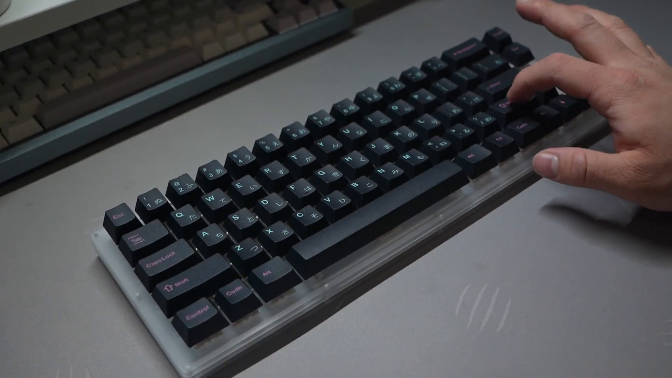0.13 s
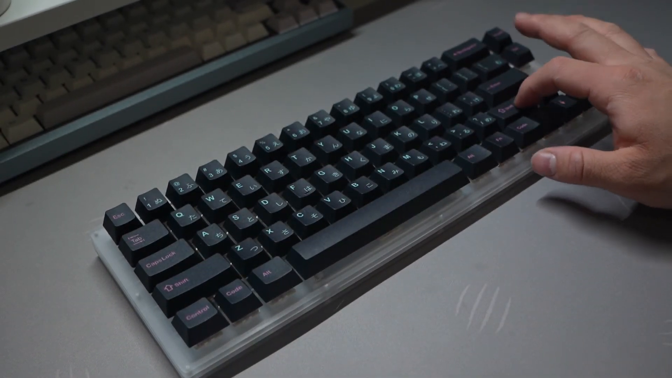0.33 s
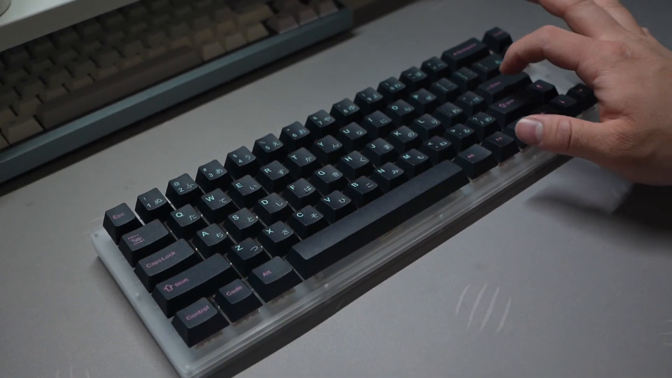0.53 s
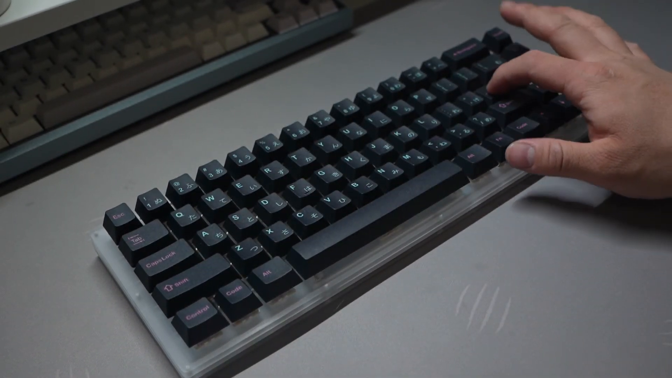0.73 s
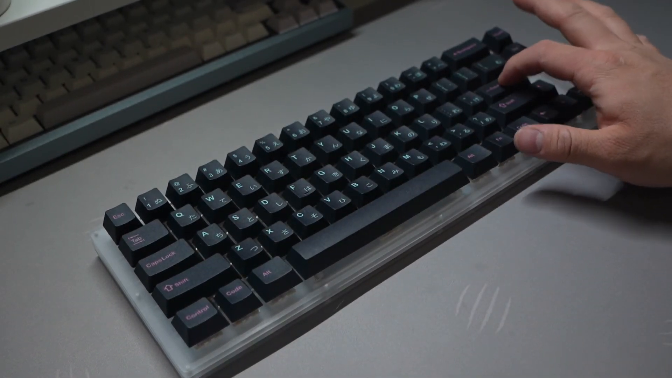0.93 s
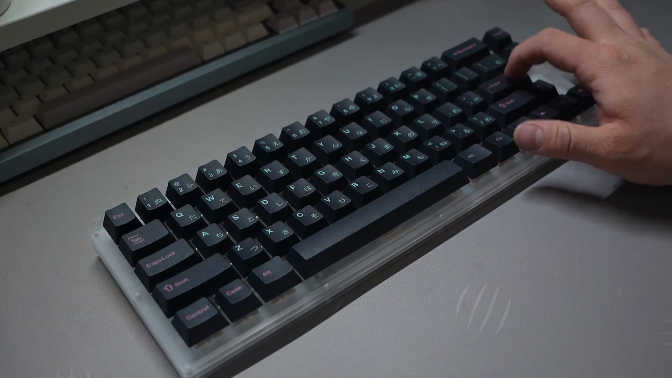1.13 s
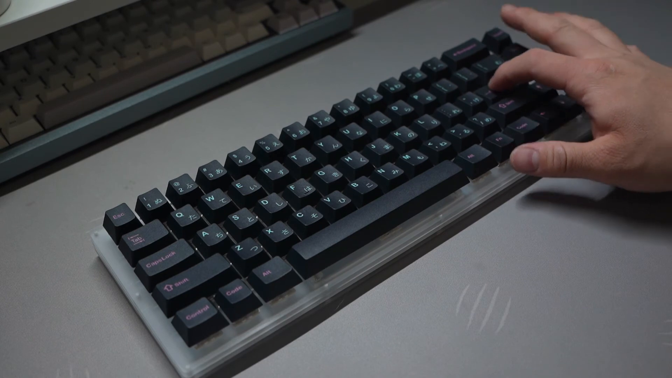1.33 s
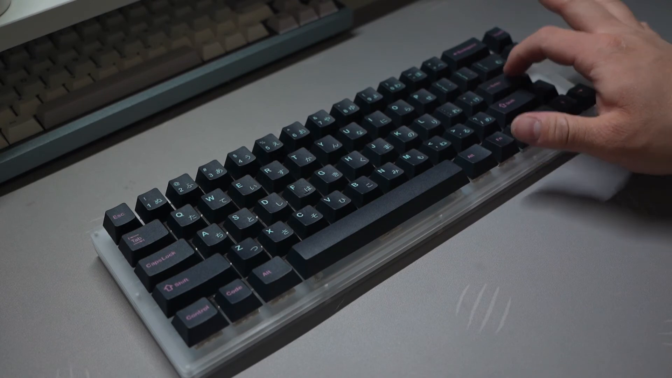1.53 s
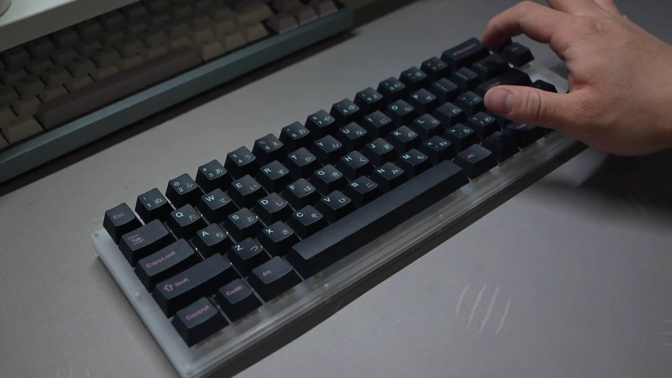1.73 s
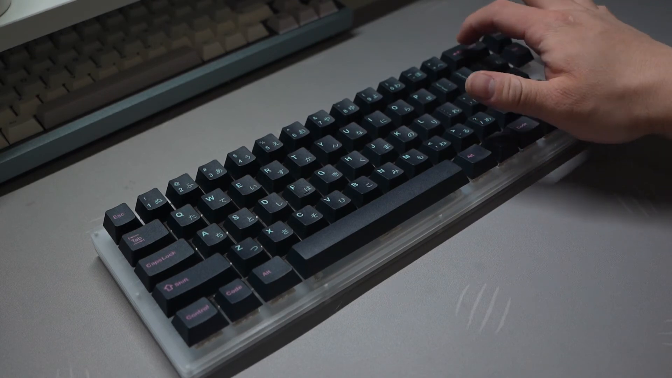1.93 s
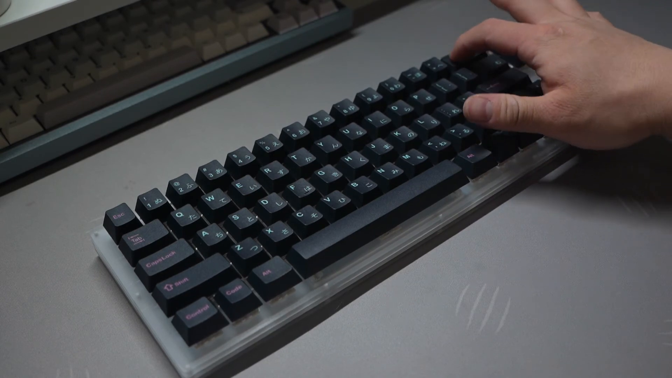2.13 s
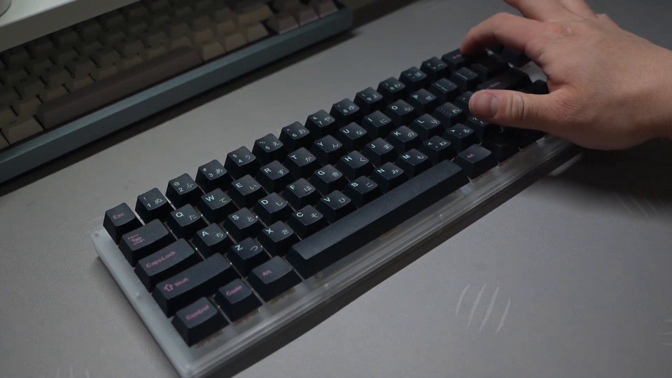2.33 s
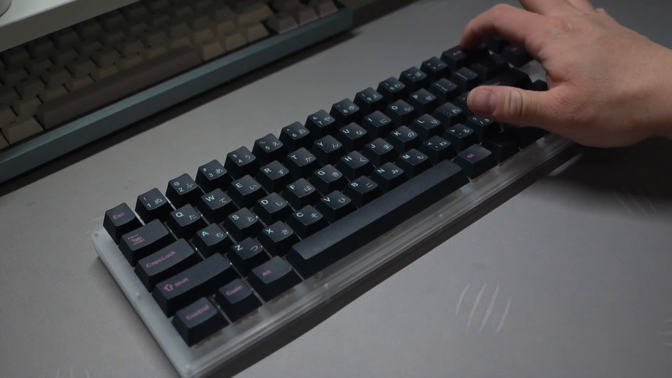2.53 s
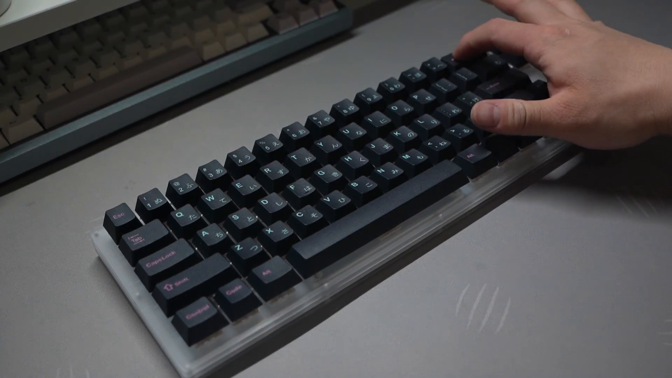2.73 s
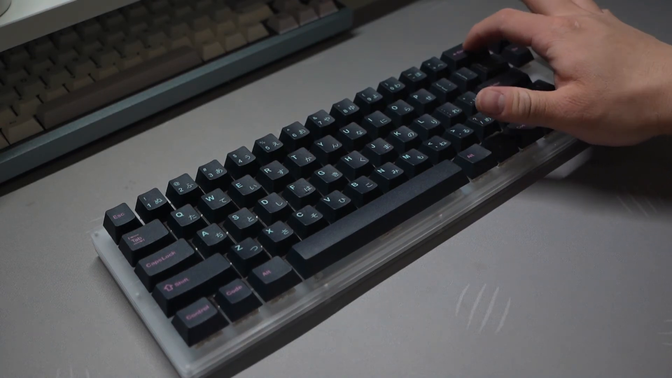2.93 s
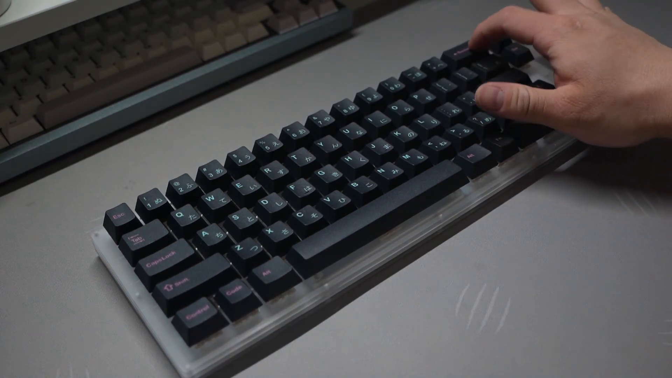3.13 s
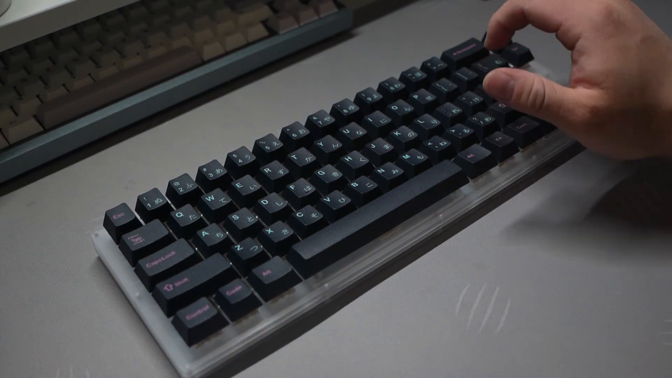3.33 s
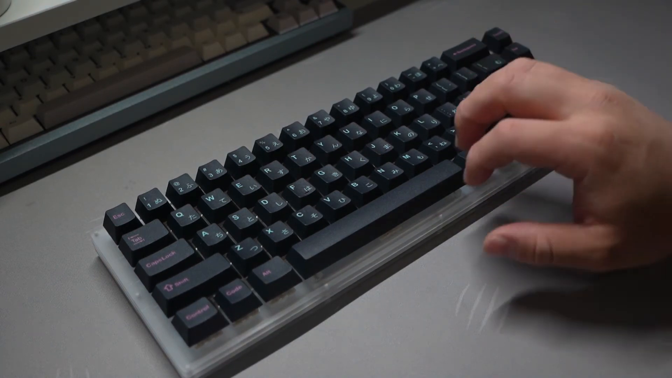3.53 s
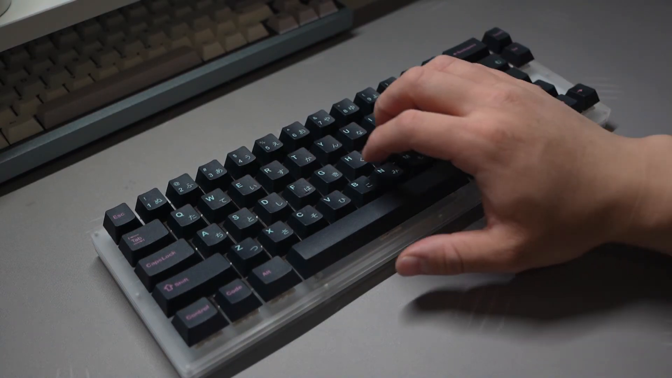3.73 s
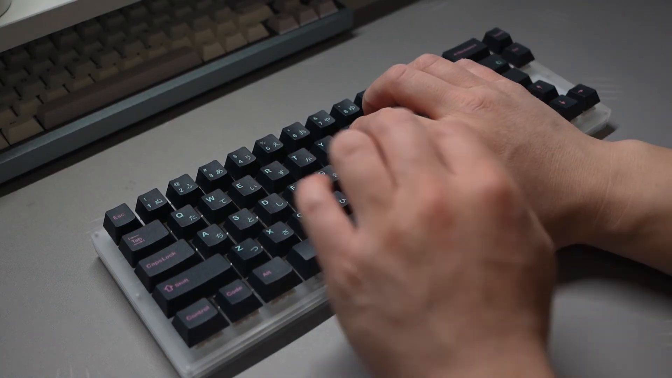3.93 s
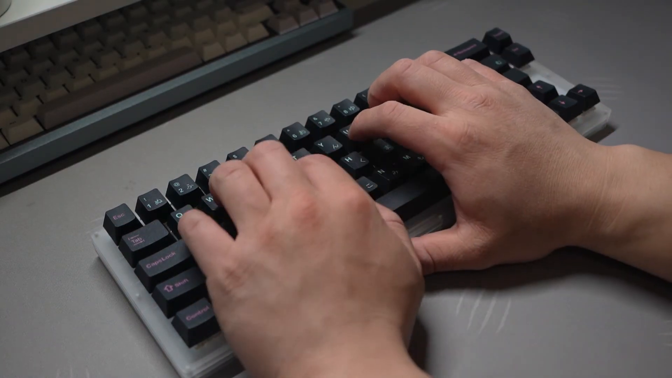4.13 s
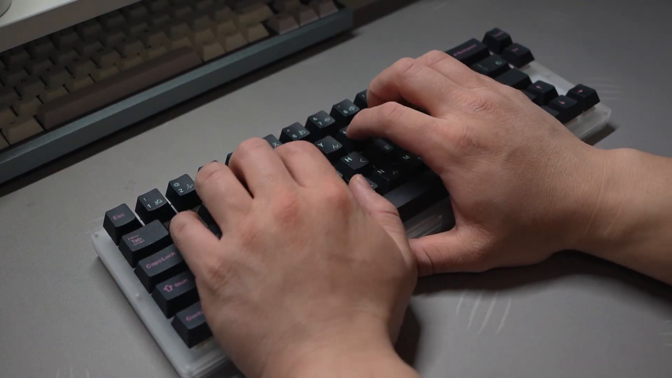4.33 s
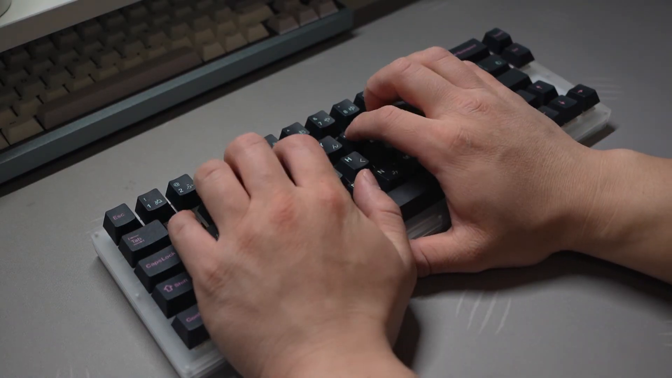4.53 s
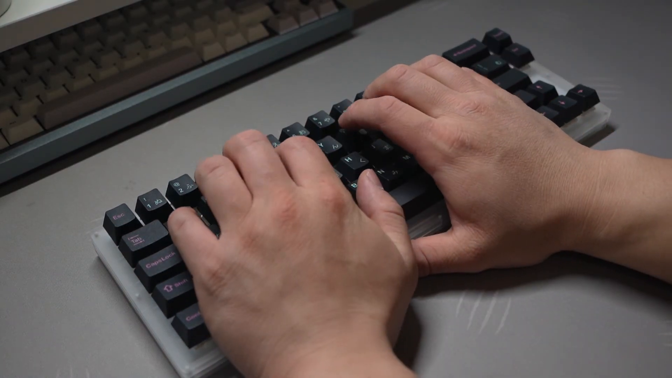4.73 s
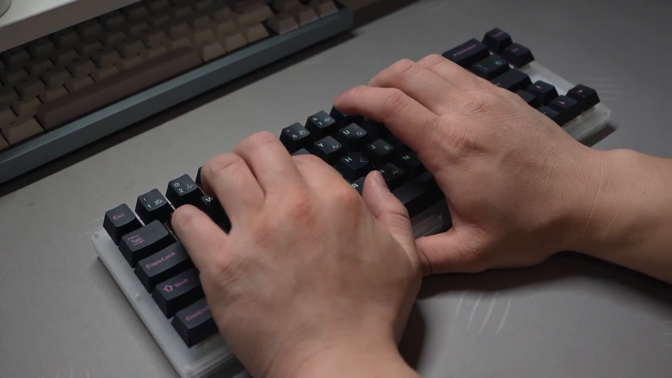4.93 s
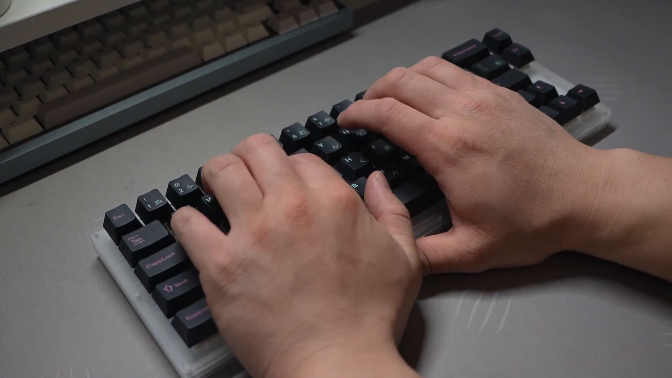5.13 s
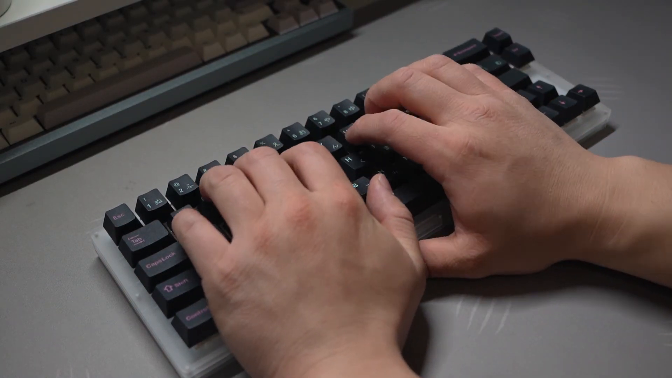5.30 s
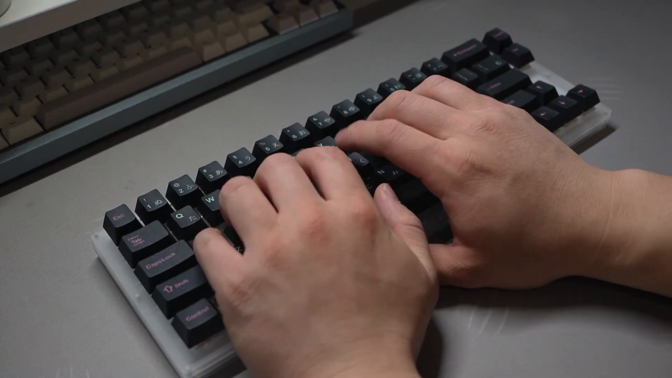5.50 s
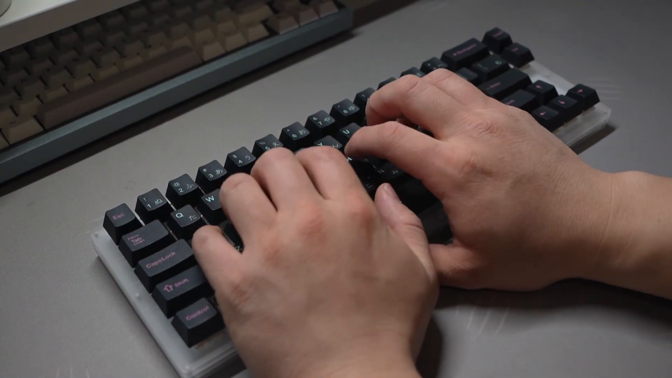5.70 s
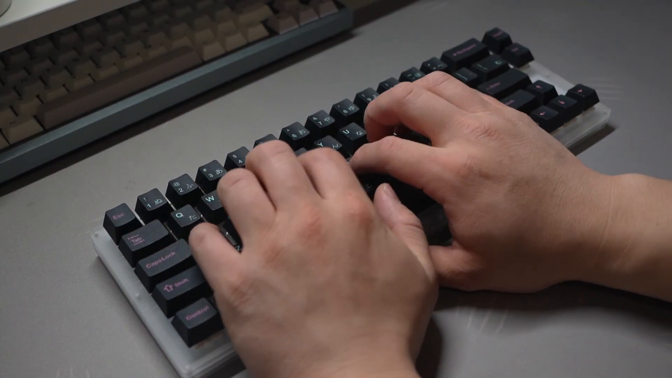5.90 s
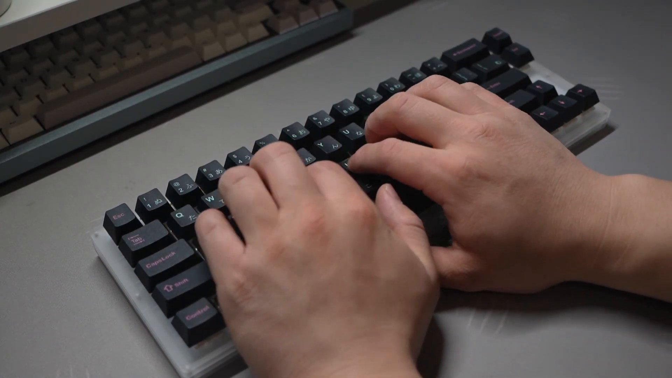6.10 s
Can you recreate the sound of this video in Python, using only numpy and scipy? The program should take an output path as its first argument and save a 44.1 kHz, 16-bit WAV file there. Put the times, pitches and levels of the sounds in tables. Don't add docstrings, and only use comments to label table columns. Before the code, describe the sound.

Close-up mechanical keyboard in a small quiet room. A finger taps one wide key four times, a second seven times growing harder, a third ten times with a lower, hollower tone, each press followed by a lighter upstroke click. A sleeve brushes faintly in the pause, then both hands type rapidly in dense uneven bursts to the end.

```python
import sys
import numpy as np
from scipy import signal
from scipy.fft import rfft, irfft
from scipy.io import wavfile
from scipy.ndimage import uniform_filter1d

SR = 44100
rng = np.random.default_rng(int(sys.argv[2]) if len(sys.argv) > 2 else 0)


def convert_level_to_amplitude(level_db):
    exponent = np.asarray(level_db, float) / 20
    return 10 ** exponent


def unload_audio(sound):
    columns = np.transpose(np.atleast_2d(sound))
    steps = np.round(np.clip(columns, -1, 1) * 32767)
    wavfile.write(sys.argv[1], SR, steps.astype(np.int16))


N = 271656
LEAD = 4410


def evened(x):
    return x / np.sqrt(np.mean(x ** 2) + 1e-20)


def read(points, hz):
    f, value = np.transpose(points)
    return np.interp(np.log(hz + 1), np.log(f + 1), value)


def coloured(x, points):
    gain = convert_level_to_amplitude(read(points, np.fft.rfftfreq(len(x), 1 / SR)))
    return irfft(rfft(x) * gain, len(x))


def add(mix, s, sound):
    part = mix[round(s * SR):][:len(sound)]
    part += sound[:len(part)]


def ring(hz, width, t):
    return np.exp(-np.pi * width * t) * np.sin(2 * np.pi * hz * t)


# freq_hz, width_hz, level_db
KEY_A_MODES = [(645, 220, -19.5), (1340, 580, -10), (1940, 460, -4.5), (2540, 340, -2.5), (2865, 280, 2.5),
               (3340, 410, -2.5), (4030, 1000, -7), (5070, 700, -12.5), (6230, 800, -7.5),
               (8260, 2100, -13), (10600, 1600, -16), (13700, 2400, -22.5)]
# freq_hz, width_hz, level_db
KEY_A_WIRES = [(6500, 130, -18), (2950, 550, -23)]
# start_s, clack_db, touch_db, extra_plate_db, extra_stem_db
KEY_A_STROKES = [
    (-0.065, -12, -60, -4.5, -3.5),
    (0.0781, -12, -37.5, 2.5, -0.5),
    (0.223, -14.5, -73.5, -4, -1.5),
    (0.3638, -12, -25, 0, -1),
]
# case_db, plate_db, stem_db
KEY_A_VOICE = [
    (-13.5, -4, 11),
    (-17.5, -16.5, -1),
    (-29.5, 5, -4.5),
]
KEY_A_LAG = (0.72, 1, 0.082)
# start_s, clack_db, plate_db, stem_db, cap_hz
KEY_A_LOOSE = [
    (0.1, -29, -12.5, -39.5, 3300),
    (0.285, -35, -31, -5, 4000),
]
# start_s, clack_db, plate_db, stem_db, cap_hz
KEY_A_RELEASES = [
    (0.0086, -35, -1, 7.5, 2640),
    (0.1612, -33, -2.5, 9, 2090),
    (0.3055, -31.5, -8, -2, 1660),
    (0.4464, -27.5, -8.5, 7, 3630),
]
CAP_RINGS = [
    [2800, 2450, 3300, 2780],
    [3480, 2950, 3010, 3060, 3420, 3660, 4600],
    [2300, 3420, 3420, 3250, 2500, 2200, 3420, 3250, 4200, 2300],
]
# level_db at a silent cap, db_per_db
THUD_OF_LOOSE = (-51.5, 1)
# level_db at a silent cap, db_per_db
THUD_OF_RELEASE = [
    (-40, 1),
    (-52, 0.82),
    (-34.5, 0.58),
]


def key_a():
    downs = strokes(KEY_A_STROKES, KEY_A_VOICE, KEY_A_LAG, lead_s=0.0106, echo_db=-26, cap_hz=CAP_RINGS[0])
    loose = contacts(KEY_A_LOOSE, THUD_OF_LOOSE)
    ups = contacts(KEY_A_RELEASES, THUD_OF_RELEASE[0])
    return key(np.vstack([downs, loose, ups]), KEY_A_MODES, -42.5, KEY_A_WIRES, alike=0.6,
               plate_far_db=1.5, cap_db=1.5, settle=0.15, cap_far_db=-3)


# freq_hz, width_hz, level_db
KEY_B_MODES = [(400, 430, -11.5), (657, 240, -9), (1270, 390, -2), (1930, 290, -3.5), (2350, 580, -8),
               (2900, 570, 1), (3580, 570, 2.5), (4710, 1000, 2.5), (5700, 730, 0.5), (6880, 1300, -2.5),
               (8500, 1500, -1.5), (10100, 4500, -8.5), (13000, 4200, -25)]
# freq_hz, width_hz, level_db
KEY_B_WIRES = [(5950, 330, -10.5), (10100, 710, -13)]
# start_s, clack_db, touch_db, extra_plate_db, extra_stem_db
KEY_B_STROKES = [
    (0.641, -19, -54.5, 0.39, 0.18),
    (0.7894, -19.5, -70.5, .3, .3),
    (0.929, -16, -51.5, 0.27, 0.36),
    (1.069, -14, -43, .3, .3),
    (1.2127, -10, -37.5, .3, .3),
    (1.3572, -9.5, -45, 0.32, 0.28),
    (1.5017, -11, -40.5, .3, 0.318),
]
# case_db, plate_db, stem_db
KEY_B_VOICE = [
    (-11.5, -11.5, -9),
    (-25.5, -16, -0.5),
    (-18, 2.5, 8),
]
KEY_B_LAG = (0.27, 0.25, -0.13)
# start_s, clack_db, plate_db, stem_db, cap_hz
KEY_B_STRAYS = [
    (0.6283, -59.5, 12, 7, 3000),
    (0.726, -31.5, -9, -7, 4500),
    (0.858, -35, -13, -2.5, 2200),
    (1.441, -30.5, -7.5, -3.5, 3800),
]
# freq_hz, level_db
KEY_B_AROUND = [(1500, -0.5), (2250, -2), (2950, 2.5), (3800, 1), (5200, -5.5), (5950, -0.5), (7200, -0.5)]


def key_b():
    downs = strokes(KEY_B_STROKES, KEY_B_VOICE, KEY_B_LAG, lead_s=0.0087, echo_db=-29.5, cap_hz=CAP_RINGS[1])
    blows = np.vstack([downs, contacts(KEY_B_STRAYS, THUD_OF_LOOSE)])
    clacks, spread, pushes, shakes = key(blows, KEY_B_MODES, -41.5, KEY_B_WIRES, alike=0.55,
                                         plate_far_db=-1.5, cap_db=1.5, settle=0.1, cap_far_db=-9)
    return clacks, coloured(spread, KEY_B_AROUND), pushes, shakes


# freq_hz, width_hz, level_db
KEY_C_MODES = [(606, 100, -13), (860, 290, -1), (1080, 63, 2), (1248, 430, 3), (1850, 110, -2.5),
               (2300, 180, -3.5), (3300, 1160, -2.5), (4400, 720, -11.5), (5250, 460, -7), (7140, 2200, -7),
               (8750, 2000, -16), (11300, 1400, -13.5), (14560, 1400, -23.5)]
# freq_hz, width_hz, level_db
KEY_C_WIRES = [(5760, 150, -11.5), (7560, 1000, -14)]
# start_s, clack_db, touch_db, extra_plate_db, extra_stem_db
KEY_C_STROKES = [
    (1.8875, -14, -40, 1, 0.28),
    (2.0374, -20, -48, 0.5, 0.63),
    (2.1904, -18.5, -49, -1.5, 0.58),
    (2.3317, -14.5, -39, -6, 0.37),
    (2.475, -18.5, -35, -3, 0.13),
    (2.6191, -16, -35.5, -3.5, .3),
    (2.7608, -21.5, -66.5, -1, 0.24),
    (2.9155, -16, -43.5, -4.5, 0.33),
    (3.0731, -21.5, -37, -2.5, 0.18),
    (3.208, -16, -30.5, -1.5, 0.29),
]
# case_db, plate_db, stem_db
KEY_C_VOICE = [
    (-11.5, -17.5, -0.5),
    (-18, -6.5, 1.2),
    (-62, -11, -11),
]
KEY_C_LAG = (0.49, 0.73, 0.51)
# start_s, clack_db, plate_db, stem_db, cap_hz
KEY_C_LOOSE = [
    (1.8774, -50.5, -16, 5, 3300),
]


def key_c():
    downs = strokes(KEY_C_STROKES, KEY_C_VOICE, KEY_C_LAG, lead_s=0.0096, echo_db=-31, cap_hz=CAP_RINGS[2])
    blows = np.vstack([downs, contacts(KEY_C_LOOSE, THUD_OF_LOOSE)])
    return key(blows, KEY_C_MODES, -37.5, KEY_C_WIRES, alike=0.45,
               plate_far_db=-3, cap_db=-1.5, settle=0.12, cap_far_db=-6)


# freq_hz, width_hz, level_db
EARLY_MODES = [(630, 81, -6), (1055, 103, 9), (1330, 280, 9), (1680, 210, 9.5), (2370, 1370, 1.5),
               (3420, 450, -0.5), (4070, 1070, -5.5), (5120, 990, -10), (6600, 1900, -10),
               (8500, 2000, -7.5), (10450, 860, -11), (12500, 2900, -19.5)]
# freq_hz, width_hz, level_db
EARLY_WIRES = [(10300, 890, -21)]
# start_s, clack_db, plate_db, stem_db
FINGERS_SETTLE = [
    (3.9025, -50, -17, -27),
    (4.0686, -51.5, -17, 0.5),
    (4.1855, -30, -14.5, -2.5),
    (4.2044, -40, -13, -2),
    (4.2671, -41.5, -5, -5),
    (4.6798, -43, -19, -3),
    (4.3024, -46.5, 3.5, -11),
    (4.3532, -47, -22, 5),
]
# start_s, clack_db, plate_db, stem_db
TYPING_1 = [(4.3832, -19, -15, -9.5), (4.3971, -34, 2, -14), (4.4021, -20.5, -12, -8),
            (4.409, -21, -14, -11), (4.4466, -31, -4.5, -2.5), (4.4895, -25.5, -10.5, -15),
            (4.4948, -31, -24, -12), (4.5004, -25.5, -11.5, -8), (4.5342, -17, -17, -8),
            (4.5532, -47, 6, -17), (4.5635, -34, 4, -3), (4.5672, -24.5, -17, -7), (4.581, -29, -8, -1),
            (4.5925, -28, -3, -10), (4.5985, -24, -10, -6), (4.6096, -16, -12.5, -4.5),
            (4.6217, -56, -14, 2), (4.6286, -42, 3, -25), (4.634, -28, -27, -14), (4.6457, -23, -8.5, -5.5),
            (4.6957, -20, -11, -9), (4.6984, -21.5, -10.5, -7), (4.7005, -34, -3, -3),
            (4.718, -26.5, -14, -8)]
TYPING_2 = [(4.7764, -21.5, -12, -19), (4.7826, -18, -14, -14), (4.7935, -34, 1, 3), (4.8237, -37, -7, -8),
            (4.8342, -18.5, -16.5, -4.5), (4.8467, -41, -11, -13), (4.8555, -16, -16.5, -12),
            (4.8775, -34, -7, -15), (4.8997, -11, -12, -7.5), (4.9317, -26.5, -13, -6),
            (4.9512, -11.5, -19, -18.5), (4.9626, -27, -16, -11), (4.982, -23, -12, -9)]
TYPING_3 = [(5.0459, -4, -25.5, -16.5), (5.057, -40, -19, -4), (5.066, -33, -1, -1),
            (5.0722, -31, -18, -23), (5.0908, -20, -9, -7.5), (5.1009, -21, -15, -12),
            (5.1537, -16, -16, -8.5), (5.156, -12.5, -11.5, -12.5), (5.1803, -9.5, -22.5, -14),
            (5.1996, -20.5, -37, -23), (5.2565, -15, -17, -15.5), (5.2659, -22, -12, -20),
            (5.297, -37, 1, -8), (5.3215, -36, -12, -5), (5.335, -32.5, -13, -8), (5.347, -38.5, -1, 1),
            (5.356, -30, -15, -6), (5.3713, -32, -4, 0), (5.3865, -32.5, -5, -3)]
EARLY_CAPS_1 = [1610, 3600, 4230, 2950, 1680, 4160, 1510, 3530, 2240, 2730, 2930, 2760, 2110, 2800, 2780,
                2800, 2650, 1550, 2650, 1500, 4500, 2970, 2820, 2900, 3080, 1497, 3160, 1750, 2910, 2070,
                2560, 3010]
EARLY_CAPS_2 = [3250, 2930, 3400, 2130, 2900, 2930, 3200, 1520, 1940, 2730, 3570, 2990, 1680, 2350, 3150,
                3210, 2520, 2900, 2970, 2410, 2450, 2970, 3530, 2790, 1620, 2650, 1810, 2800, 2520, 3010,
                1690, 1470]
# start_s, clack_db, plate_db, stem_db, cap_hz
EARLY_SECONDS = [
    (4.511, -51, -10, 0, 3020),
    (4.864, -30, -8, -11, 2970),
    (4.9036, -24, -16, -2, 2920),
    (4.972, -31, -17, -8, 3500),
    (4.546, -40, -5, 3, 3000),
    (5.038, -51, -15, 8, 3500),
    (5.175, -25, -15, -14, 2900),
    (5.238, -48, -13, 4, 3060),
]
# level_db at a silent cap, db_per_db
EARLY_THUD = (-45.5, 0.76)


def letters_early():
    typed = FINGERS_SETTLE + TYPING_1 + TYPING_2 + TYPING_3
    rows = np.column_stack([typed, np.append(EARLY_CAPS_1, EARLY_CAPS_2)])
    blows = contacts([*rows, *EARLY_SECONDS], EARLY_THUD)
    return key(blows, EARLY_MODES, -45, EARLY_WIRES, alike=0.3,
               plate_far_db=-1.5, cap_db=5.5, settle=0.08, cap_far_db=1.5)


# freq_hz, width_hz, level_db
LATE_MODES = [(630, 190, -3), (1104, 105, -3), (1420, 330, -1), (1796, 82, -1), (2520, 1200, 2),
              (3340, 800, 1.5), (4290, 760, -9), (5770, 1800, -29), (8000, 1600, -18.5), (9800, 1200, -29),
              (11430, 970, -23.5), (13950, 1800, -38)]
# freq_hz, width_hz, level_db
LATE_WIRES = [(11950, 900, -14)]
# start_s, clack_db, plate_db, stem_db
TYPING_4 = [(5.442, -14.5, -15, -10.5), (5.4621, -45, -23, 8), (5.5161, -16.5, -17, -12.5),
            (5.5264, -16.5, -25, -14), (5.5401, -14.5, -19, -19), (5.5485, -21, -21, -5.5),
            (5.6118, -16.5, -14.5, -5), (5.6213, -18.5, -15, -14), (5.6523, -34.5, -1, 10),
            (5.659, -31, -8, 6), (5.6769, -29.5, -14, -7)]
TYPING_5 = [(5.7275, -20.5, -13, -12), (5.738, -17, -19, -12), (5.766, -24, -14, -6),
            (5.789, -24.5, -28, 2.5), (5.8079, -15.5, -21, -17), (5.8257, -17, -35, -15),
            (5.837, -21, -12.5, -4), (5.8537, -27, -13, -2), (5.876, -34, -2, 4), (5.89, -17, -17, -4.5),
            (5.8996, -37, 1, 6), (5.9185, -30, -11, -20), (5.937, -30, -15, -16),
            (5.9522, -36.5, 3.5, 10.5), (5.9782, -16.5, -16.5, -7), (5.9819, -14, -15.5, -20),
            (5.9933, -24.5, -13, -5), (6.01, -29, -8, -4), (6.0442, -26.5, -41, 2),
            (6.074, -16.5, -15.5, -7.5), (6.0831, -16.5, -31, -15), (6.0998, -31, -12, -6),
            (6.124, -30, -9, 0), (6.1297, -23, -13, -4), (6.137, -32.5, -6, 7)]
LATE_CAPS = [3250, 3200, 2300, 2200, 2520, 2080, 2540, 3000, 1510, 3340, 2560, 3160, 2920, 2350, 4000, 2540,
             2540, 3230, 3060, 3010, 2980, 3270, 2540, 2910, 1850, 2950, 3040, 2500, 2300, 4270, 2640, 2520,
             3480, 3420, 2540, 3520]
# start_s, clack_db, plate_db, stem_db, cap_hz
LATE_SECONDS = [
    (5.473, -43, -15, 5, 3280),
    (5.73, -28.5, -1, 1, 3180),
    (6.064, -46, -21, 10, 3480),
]
# level_db at a silent cap, db_per_db
LATE_THUD = (-48, 0.94)


def letters_late():
    rows = np.column_stack([TYPING_4 + TYPING_5, np.ravel(LATE_CAPS)])
    blows = contacts([*rows, *LATE_SECONDS], LATE_THUD)
    return key(blows, LATE_MODES, -45, LATE_WIRES, alike=0.3,
               plate_far_db=-1.5, cap_db=6.0, settle=0.08, cap_far_db=1.5)


# freq_hz, width_hz, level_db
KEY_B_UP_MODES = [(600, 450, -22), (1230, 350, -2.5), (1870, 370, -7.5), (2520, 220, -8.5),
                  (3600, 300, -10), (4500, 800, -16.5), (5890, 600, -9.5), (8250, 1000, -16),
                  (9980, 1500, -19.5), (12850, 3000, -32.5)]
# start_s, clack_db, plate_db, stem_db, cap_hz
KEY_B_RELEASES = [
    (0.717, -31, -17, -8, 3000),
    (0.867, -34, -5, -6, 3100),
    (1.005, -24.5, -16, -15, 3030),
    (1.146, -24, -11, -7.5, 2870),
    (1.2925, -27.5, -8.5, -7.5, 2900),
    (1.433, -34, -6, 3, 2800),
    (1.586, -25, -13.5, -10, 2950),
]


def key_b_up():
    return key(contacts(KEY_B_RELEASES, THUD_OF_RELEASE[1]), KEY_B_UP_MODES, -41.5, KEY_B_WIRES[:1], alike=0.5,
               plate_far_db=-1.5, cap_db=-2.5, settle=0.1, cap_far_db=-1.5)


# freq_hz, width_hz, level_db
KEY_C_UP_MODES = [(610, 720, -13), (1105, 310, -3), (1820, 320, -5.5), (2300, 1100, 0.5), (3370, 780, 0),
                  (4500, 1300, -8), (5610, 940, -4.5), (7060, 750, -3), (8700, 1800, -18),
                  (11200, 1700, -20), (14400, 1600, -23)]
# start_s, clack_db, plate_db, stem_db, cap_hz
KEY_C_RELEASES = [
    (1.9688, -26.5, -15, -2, 3250),
    (2.115, -24.5, -17, -5, 3400),
    (2.265, -24.5, -22, -6, 2200),
    (2.412, -30, -14, 0.5, 2300),
    (2.562, -29.5, -12.5, -1, 3500),
    (2.6996, -26, -15, -2.5, 2300),
    (2.8411, -24, -12, -2, 2100),
    (2.996, -28.5, -12, 4, 3400),
    (3.143, -29.5, -10, 3.5, 1970),
    (3.294, -35.5, -6, 9.5, 1930),
]


def key_c_up():
    return key(contacts(KEY_C_RELEASES, THUD_OF_RELEASE[2]), KEY_C_UP_MODES, -37.5, KEY_C_WIRES[:1], alike=0.5,
               plate_far_db=-1.5, cap_db=1.5, settle=0.1, cap_far_db=-1.5)


def strokes(downs, voice, lag, lead_s, echo_db, cap_hz, echo_s=0.0099):
    s, db, touch_db, plate_db, stem_db = np.transpose(downs)
    extra_db = np.column_stack([0 * s, plate_db, stem_db])
    parts = [(s - lead_s, touch_db, 0), (s, db, extra_db), (s + echo_s, db + echo_db, extra_db)]
    rows = []
    for (at, level, extra), colour in zip(parts, np.array(voice)):
        lagging_db = np.outer(level - np.median(level), lag)
        rows.append(np.column_stack([at, level, extra + colour - lagging_db, cap_hz + 0 * s]))
    return np.vstack(rows)


def contacts(rows, thud):
    s, db, plate_db, stem_db, cap_hz = np.transpose(rows)
    return np.column_stack([s, db, thud[0] - thud[1] * db, plate_db, stem_db, cap_hz])


def key(blows, modes, shake_db, wires, alike, plate_far_db, cap_db, settle, cap_far_db):
    rise_s, rattle_s, cap_width_hz = 0.00016, 0.00056, 460
    clacks, spread, pushes = np.zeros((3, N + LEAD))
    s, db, case_db, plate_db, stem_db, cap_hz = np.transpose(blows)
    near, far = [[*modes, (cap_hz[:, None], cap_width_hz, cap_db + extra_db)] for extra_db in (0, cap_far_db)]
    levels_db = db[:, None] + np.transpose([case_db, plate_db, 0 * db, stem_db])
    t = np.arange(256) / SR
    habit = rng.standard_normal(256)
    chance = np.clip(rng.standard_normal((len(s), 300)), -1.7, 1.7)
    envelope = (1 - np.exp(-t / rise_s)) * (np.exp(-t / rattle_s) + settle * np.exp(-t / 0.004))
    rattle = rfft(envelope * (alike * habit + (1 - alike) * chance[:, :256]), 1024)
    rattle /= np.sqrt(uniform_filter1d(abs(rattle) ** 2, size=11, axis=1))
    close = irfft(rattle * bodies(levels_db, near, chance[:, 256:], damping=0.5))[:, :800]
    far_db = levels_db + [0, plate_far_db, 0, 0]
    around = irfft(bodies(far_db, far, chance[:, 256:], damping=1.0))[:, :800]
    fade_in = np.minimum(np.arange(800) / 8, 1)
    for k in range(len(s)):
        at = s[k] + LEAD / SR
        add(clacks, at, close[k] * fade_in)
        add(spread, at, around[k])
        add(pushes, at, convert_level_to_amplitude(db[k:k + 1]))
    for hz, width, wire_db in wires:
        wire = convert_level_to_amplitude(wire_db) * ring(hz, width, np.arange(4096) / SR)
        spread += signal.oaconvolve(pushes ** 1.1, wire)[:N + LEAD]
    return clacks, spread, pushes, convert_level_to_amplitude(shake_db) * pushes ** 0.68


BODY_EDGES = (330, 900, 1800, 5000, 16000)
BODY_CENTRES = (600, 1280, 3000, 8000)
BODY_TRIM = (1.1, 2.24, 2.83, 2.07)


def bodies(levels_db, modes, chance, damping, detune=0.015, vary_db=2.0):
    hz = np.fft.rfftfreq(1024, 1 / SR)
    power = 0
    for k, (f, width, db) in enumerate(modes):
        centre = f * (1 + detune * chance[:, [-1 - k]])
        offset = (hz - centre) / (damping * width)
        power = power + convert_level_to_amplitude(2 * (db + vary_db * chance[:, [k]])) / (1 + offset ** 2) ** 2
    gain = np.sqrt(power)
    bands = zip(BODY_EDGES, BODY_EDGES[1:])
    peaks = np.transpose([gain[:, (hz > lo) & (hz <= hi)].sum(axis=1) / 512 for lo, hi in bands])
    lift_db = levels_db + BODY_TRIM - 20 * np.log10(peaks)
    gain *= convert_level_to_amplitude(np.array([read(list(zip(BODY_CENTRES, row)), hz) for row in lift_db]))
    return causal(gain * np.minimum(hz / 420, 1) ** 2.5)


def causal(gain):
    log_gain = np.log(np.hstack([gain, gain[:, -2:0:-1]]) + 1e-7)
    return gain * np.exp(-1j * signal.hilbert(log_gain).imag[:, :gain.shape[1]])


# start_s, freq_hz, width_hz, level_db
WIRE_PINGS = [
    (0.7895, 10500, 700, -35),
    (0.929, 6450, 600, -7),
    (1.2126, 8500, 500, -2),
    (1.3571, 10180, 500, -10),
    (2.9157, 795, 295, -25.5),
    (4.6096, 6600, 450, -17.5),
    (4.6457, 4970, 454, -19),
]


def pings():
    out, t = np.zeros(N + LEAD), np.arange(1024) / SR
    for s, hz, width, db in WIRE_PINGS:
        add(out, s + LEAD / SR, convert_level_to_amplitude(db) * ring(hz, width, t) * (1 - np.exp(-t / 0.0011)))
    return out


# (start_s, level_db)
SINGING_WIRES = [
    (9300, [(0.223, -33.5), (0.354, -34)]),
    (1078, [(1.9685, -43), (2.115, -48), (2.266, -42), (2.7, -46.5), (2.841, -46)]),
    (5600, [(1.8875, -36), (1.9689, -50), (2.115, -56), (2.266, -56), (2.4117, -52), (2.6995, -49), (2.8412, -56), (2.996, -47), (3.1422, -36), (3.293, -37)]),
]


def singing():
    t60_s, rise_s, beat = 0.064, 0.003, 0.0087
    out, t = np.zeros(N + LEAD), np.arange(4096) / SR
    for hz, blows in SINGING_WIRES:
        pair = np.sin(2 * np.pi * hz * t) + 0.46 * np.sin(2 * np.pi * hz * (1 + beat) * t)
        for s, db in blows:
            add(out, s + LEAD / SR, convert_level_to_amplitude(db - 60 * t / t60_s) * (1 - np.exp(-t / rise_s)) * pair)
    return out


SCRAPE_LEVELS = (-34, -52, -46, -45, -34, -58, -48)
# freq_hz, level_db
GUIDE_COLOUR = [(600, -1.5), (2500, 0), (14000, -36)]


def scrape(pushes_by_key, lead_s=0.0037):
    pushes = convert_level_to_amplitude(np.array(SCRAPE_LEVELS)) @ pushes_by_key
    ramp = np.linspace(0, 1, round(lead_s * SR)) ** 0.44
    ahead = signal.oaconvolve(pushes, ramp)[len(ramp):len(ramp) + len(pushes) - 1]
    travel = np.append(ahead, np.zeros(len(pushes)))[:len(pushes)]
    return travel[LEAD:] * evened(coloured(rng.standard_normal(N), GUIDE_COLOUR))


THUMP_LEVELS = (-27, -34.5, -53, -36, -27.5, -40, -53)


def thumps(pushes_by_key):
    t = np.arange(SR // 4) / SR
    knock = ring(82.5, 29.7, t) * (1 - np.exp(-t / 0.005))
    out = np.zeros(N)
    for db, pushes in zip(THUMP_LEVELS, pushes_by_key):
        out += convert_level_to_amplitude(db) * signal.oaconvolve(pushes ** 0.91, knock)[LEAD:LEAD + N]
    return out


def desk(pushes):
    t = np.arange(SR) / SR
    sway = (ring(28.33, 1.67, t) + convert_level_to_amplitude(-17.0) * ring(130, 7.9, t)) * (1 - np.exp(-t / 0.0085))
    return signal.oaconvolve(pushes, sway)[LEAD:LEAD + N]


# freq_hz, t60_s
ROOM_DECAY = [(300, 0.95), (1000, 0.34), (3000, 0.4), (6000, 0.35), (10000, 0.31), (16000, 0.24)]
# freq_hz, level_db
WALL_COLOUR = [(300, -12.5), (800, -8.5), (1200, 1), (1600, 0), (3000, -2.5), (6000, -6.5), (10000, -1.5),
               (16000, -10.5)]
# delay_s, level_db
FIRST_WALLS = [
    (0.013, -26.5),
    (0.017, -25),
    (0.028, -22.5),
]


def room(clacks, spread, gap_s=0.0088, swell_s=0.00015, turns=1.683):
    taps, echoes = np.zeros((3, SR)), np.zeros(SR)
    at = np.arange(0, SR - 20, 20)
    signs = rng.choice([-1., 1.], (3, len(at)))
    np.put_along_axis(taps, at + rng.integers(0, 20, (3, len(at))), signs, 1)
    hz, t, z = signal.stft(taps, SR, nperseg=256)
    decay = convert_level_to_amplitude(-60 * t / read(ROOM_DECAY, hz)[:, None])
    tails = signal.istft(z * decay, SR, nperseg=256)[1][:, :SR // 2]
    tails *= np.clip((np.arange(SR // 2) / SR - gap_s) / swell_s, 0.22, 1)
    tails /= np.linalg.norm(tails, axis=1, keepdims=True)
    for s, db in FIRST_WALLS:
        add(echoes, s, convert_level_to_amplitude(np.array([db])))
    phase = turns * np.arange(len(spread)) / SR + np.arange(3)[:, None] / 3
    share = np.sqrt(2 / 3) * np.cos(np.pi * phase)
    late = signal.oaconvolve(share * spread, tails, axes=1).sum(axis=0)
    wet = signal.oaconvolve(clacks, echoes)[:LEAD + N] + convert_level_to_amplitude(-8.0) * late[:LEAD + N]
    return coloured(wet, WALL_COLOUR)[LEAD:]


# time_s, level_db
SLEEVE_MOVES = [
    (3.55, -118.5),
    (3.68, -76),
    (3.78, -71.5),
    (3.88, -70),
    (3.98, -70.5),
    (4.099, -101),
    (4.25, -74),
    (4.399, -64),
]
# freq_hz, level_db
CLOTH_COLOUR = [(500, -7), (2000, -0.5), (5500, -3), (9000, -2.5), (16000, -11)]


def sleeve():
    s, db = np.transpose(SLEEVE_MOVES)
    grain_db = 1.1 * rng.standard_normal(N // 64 + 1).repeat(64)[:N]
    grain = rng.standard_normal(N) * convert_level_to_amplitude(grain_db)
    movement = convert_level_to_amplitude(np.interp(np.arange(N) / SR, s, db, -120, -120) + 2.0)
    return movement * evened(coloured(grain, CLOTH_COLOUR))


# freq_hz, level_db
HUM_PARTIALS = [(50, -66.5), (60, -75.5), (119.7, -64), (180, -74), (241, -75.5), (300, -78.5)]
# freq_hz, level_db
AIR_COLOUR = [(20, -20.5), (60, -4.5), (86, -17.5), (110, -12.5), (180, -19.5), (320, -19.5), (550, -29.5),
              (3000, -41), (10000, -46), (16500, -48)]


def quiet_room():
    t = np.arange(N) / SR
    out = convert_level_to_amplitude(-61) * evened(coloured(rng.standard_normal(N), AIR_COLOUR))
    for hz, db in HUM_PARTIALS:
        waver = evened(uniform_filter1d(uniform_filter1d(rng.standard_normal(N), 1500), 1500))
        out += convert_level_to_amplitude(db + 3.45 * waver) * np.sqrt(2) * np.sin(2 * np.pi * hz * t + waver)
    return out


def scene():
    each = np.array([key_a(), key_b(), key_c(), letters_early(), letters_late(), key_b_up(), key_c_up()])
    clacks, spread, _, shakes = each.sum(axis=0)
    pushes_by_key = each[:, 2]
    ping, song = pings(), singing()
    clacks = clacks + ping + convert_level_to_amplitude(-3.0) * song
    spread = spread + convert_level_to_amplitude(-4.5) * ping + convert_level_to_amplitude(1.0) * song
    keyboard = clacks[LEAD:] + scrape(pushes_by_key) + thumps(pushes_by_key)
    return (keyboard + desk(shakes) + room(clacks, spread) + sleeve() + quiet_room())[None]


def roll_off(x):
    return signal.sosfilt(signal.butter(12, 16830, fs=SR, output="sos"), x)


def record(dry):
    low, wide = [signal.oaconvolve(dry, signal.firwin(511, hz, window=("kaiser", 8), fs=SR)[None], "same")
                 for hz in (15900, 16750)]
    top = wide - low
    loud = uniform_filter1d(top ** 2, size=256) > convert_level_to_amplitude(2 * -76.0)
    return roll_off(low + top * uniform_filter1d(loud * 1., size=256))


dry = scene()
out = record(dry)
unload_audio(out)
```